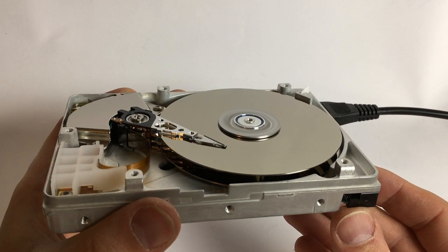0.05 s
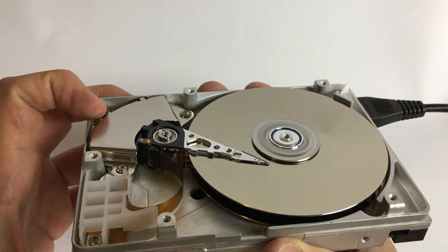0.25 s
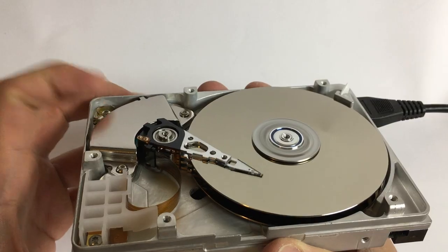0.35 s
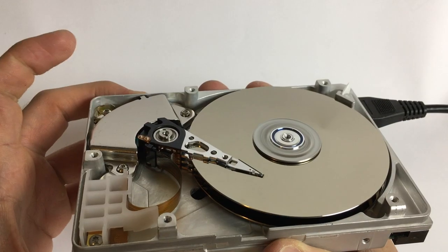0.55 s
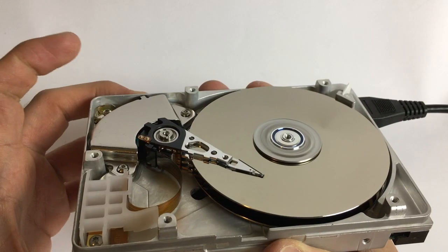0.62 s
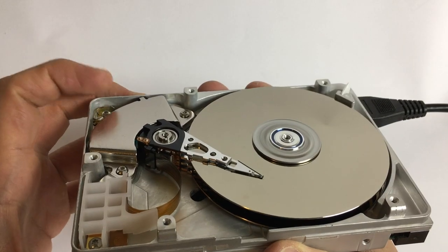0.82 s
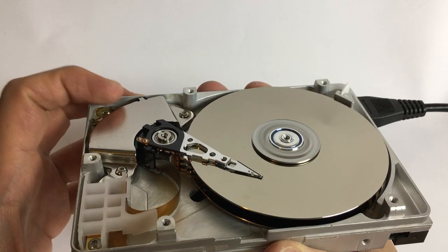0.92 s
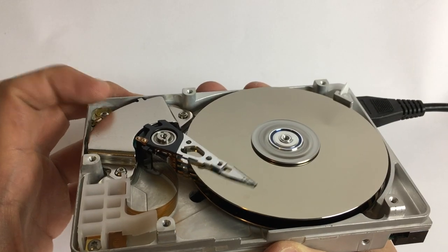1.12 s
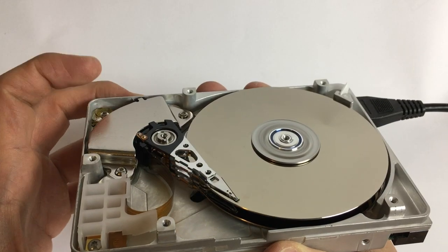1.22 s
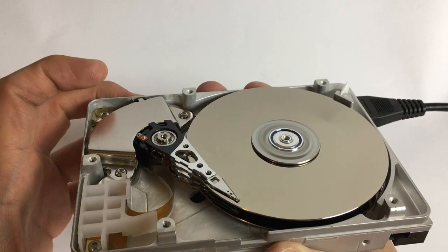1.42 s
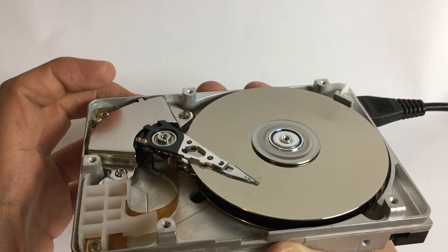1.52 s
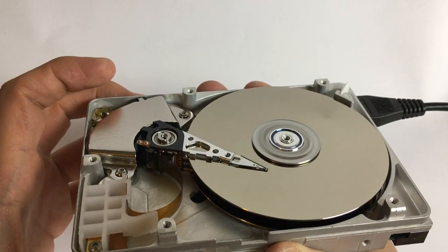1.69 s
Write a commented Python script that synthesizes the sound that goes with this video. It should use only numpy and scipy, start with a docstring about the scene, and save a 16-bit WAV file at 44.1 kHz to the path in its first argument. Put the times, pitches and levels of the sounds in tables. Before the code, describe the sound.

An open hard drive whirs throughout, close by in a small room, with high singing tones. A thin whine stops just before 0.2 seconds, then the flicked arm hits its stop with a loud metallic double click and a soft bump. Light ticks and tiny squeaks follow around 0.3 seconds and from 1 second on. From 1.3 seconds the heads scrape the platter while the whirr swells.

```python
"""An open hard drive spins close by in a small room: shaft hum, motor whine, singing bearings, rushing air.
A thin whine stops at 0.16 s; a finger flicks the head arm, which snaps against its stop with a loud
double click at 0.22 s. The arm then ticks and the head springs squeak as it is nudged to and fro.
From 1.3 s the heads scrape on the platter while the whirr swells."""
import sys
import numpy as np
from scipy import signal
from scipy.fft import rfft, irfft
from scipy.io import wavfile
from scipy.ndimage import uniform_filter1d

SR = 44100
rng = np.random.default_rng(int(sys.argv[2]) if len(sys.argv) > 2 else 0)


def file_out(sig):
    """Save sig as 16-bit WAV at sys.argv[1]."""
    # one column per channel
    cols = np.atleast_2d(sig).T
    # limit, then scale
    lim = np.clip(cols, -1, 1)
    pcm = np.round(lim * 32767).astype(np.int16)
    wavfile.write(sys.argv[1], SR, pcm)


N = 77175
T = np.arange(N) / SR
SHAFT_HZ = 86.333

# spindle load: t/s, share/0-1
SPINDLE_LOAD = [(0, 0.5), (.3, 0), (.75, 0.14), (.92, 0.83), (1.15, 0.68), (1.28, 0.87), (1.42, 1),
                (1.75, 0.79)]
# modes of arm and head springs: f/Hz, width/Hz, level/dB
ARM_MODES = [(845, 25, 2), (905, 25, 1), (1060, 30, 5), (1170, 45, -1), (1510, 40, -8), (1640, 30, -7),
             (2305, 30, 5), (3350, 400, -9), (4950, 100, -7), (6930, 30, -5), (7380, 25, 3), (7980, 30, -6),
             (8880, 25, -5), (11295, 50, -1)]


def undb(db):
    """Decibels to gain."""
    return 10 ** (np.asarray(db) / 20)


def unit(x):
    """Scale to rms 1."""
    return x / np.sqrt(np.mean(x ** 2))


def curve(rows):
    """Linear envelope through (t/s, value) rows."""
    return np.interp(T, *np.array(rows).T)


def noise():
    """White noise."""
    return rng.standard_normal(N)


def drift(rate_hz):
    """Smooth random drift, spread near 1."""
    hold = int(SR / rate_hz)
    steps = np.repeat(noise()[:N // hold + 1], hold)
    return 1.3 * uniform_filter1d(uniform_filter1d(steps, hold), hold)[:N]


def tone(hz):
    """Sine of rms 1 along a pitch curve."""
    return np.sqrt(2) * np.sin(2 * np.pi * (np.cumsum(hz) / SR + rng.random()))


def through(x, response):
    """Convolve with a response scaled to unit energy."""
    return signal.fftconvolve(x, response / np.linalg.norm(response))[:N]


def colour(x, points, size=4096):
    """Minimum-phase filter from (f/Hz, relative level/dB) rows."""
    hz, db = np.array(points).T
    log_hz = np.log(np.fft.rfftfreq(size, 1 / SR) + 1)
    gain = undb(np.interp(log_hz, np.log(hz), db))
    cepstrum = irfft(np.log(gain))[:size // 2]
    cepstrum[1:] *= 2
    return through(x, irfft(np.exp(rfft(cepstrum, size))))


def ring(x, modes):
    """Drive damped modes of alternating sign: f/Hz, width/Hz, relative level/dB."""
    t = T[:N // 4]
    response = np.zeros_like(t)
    for k, (hz, width_hz, db) in enumerate(modes):
        envelope = undb(db) * width_hz * np.exp(-np.pi * width_hz * t)
        response += (-1) ** k * envelope * np.cos(2 * np.pi * hz * t)
    return through(x, response)


def chatter(rows):
    """Sharp bursts of contact noise that die away quickly: t/s, level/dB, length/s."""
    power = sum((T >= s) * undb(db) ** 2 * np.exp(-2 * np.abs(T - s) / length_s)
                for s, db, length_s in rows)
    return np.sqrt(power) * np.sign(noise())


def platter(x, share, t60_s=0.23, above_hz=1660):
    """A share of the treble power rings the platters' dense modes."""
    modes = noise() * np.exp(-np.log(1000) * T / t60_s)
    bass = signal.sosfiltfilt(signal.butter(2, above_hz, fs=SR, output="sos"), x)
    treble = x - bass
    return bass + np.sqrt(1 - share) * treble + np.sqrt(share) * through(treble, modes)


def room(x, t60_s=0.37, delay_s=0.00725):
    """Short, dense tail from nearby walls."""
    spectrum = [(200, -1.5), (1100, 1), (4000, 3.5), (9000, 0.5), (15000, 4)]  # f/Hz, level/dB
    tail = noise() * (T > delay_s) * np.exp(-np.log(1000) * T / t60_s)
    return undb(-10) * through(x, colour(tail, spectrum))


def room_air():
    """Faint, steady rumble of the air in the room."""
    # rumble: f/Hz, level/dB
    spectrum = [(25, -41), (55, 6), (90, 5), (130, 6), (350, -1), (700, 3), (1200, -7.5), (3000, -28.5)]
    return undb(-63) * colour(noise(), spectrum)


def spindle(speed_waver=.0001, bearing_jitter=0.000755):
    """Unbalance hums once a turn, motor poles whine, bearings sing; load shifts their levels."""
    # motor whine: shaft order, light level/dB, loaded level/dB
    motor_orders = [(72, -67, -66), (96, -73, -68), (120, -72, -66), (144, -68, -63), (168, -60, -63)]
    # bearing tones: f/Hz, light level/dB, loaded level/dB
    bearing_tones = [(3416, -67, -57), (3686, -62, -50), (3757, -65, -54), (4097, -65, -49),
                     (4113, -54, -56), (4432, -74, -48), (4841, -65, -59), (4859, -72, -53),
                     (6330, -58, -70), (6725, -70, -62)]
    speed = 1 + speed_waver * drift(4.84)
    load = curve(SPINDLE_LOAD)
    out = tone(SHAFT_HZ * speed) * undb(-65 + 4 * load + 2 * drift(14.8))
    for order, light_db, loaded_db in motor_orders:
        level_db = light_db + (loaded_db - light_db) * load
        out += tone(order * SHAFT_HZ * speed) * undb(level_db + 2 * drift(13.6))
    for hz, light_db, loaded_db in bearing_tones:
        level_db = light_db + (loaded_db - light_db) * load + 1.5 * drift(45.1)
        out += tone(hz * (speed + bearing_jitter * drift(70.3))) * undb(level_db - 0.5)
    return out


def whirr(throb_depth=0.11):
    """Air rushes off the platters and rolling noise rings the frame, throbbing once a turn."""
    # rushing air: f/Hz, level/dB
    air_spectrum = [(40, -33), (130, -15.5), (350, -9), (700, -9.5), (1300, -13), (2050, -13.5),
                    (3300, -5.5), (4300, -4.5), (5300, -11.5), (6200, -11), (7600, -21), (9000, -21),
                    (11300, -14.5), (12700, -20.5), (14300, -20), (15800, -16.5)]
    # modes of platters and frame: f/Hz, width/Hz, level/dB
    frame_modes = [(1554, 89, -11.5), (2478, 40, -9), (3207, 16, -1), (3320, 40, -7), (3740, 21, -0.5),
                   (3770, 56, -22), (4096, 26, 4.5), (4202, 32, -2), (4300, 25, -14), (4820, 10, -26),
                   (4905, 17, -5)]
    # whirr envelope: t/s, level/dB
    levels = [(0, -42), (.1, -37), (.16, -41), (.2, -37.5), (.36, -42.5), (.52, -45.5), (.74, -45),
              (.86, -44), (.92, -41.5), (1.06, -44), (1.2, -40), (1.29, -41.5), (1.36, -37.5), (1.5, -39),
              (1.62, -37), (1.75, -42.5)]
    air = colour(platter(noise(), share=0.57), air_spectrum) * undb(-3 + drift(60.57))
    frame = ring(noise(), frame_modes) * undb(-6.5 - curve(SPINDLE_LOAD))
    throb = 1 + throb_depth * np.sin(2 * np.pi * SHAFT_HZ * T)
    return (air + frame) * undb(curve(levels)) * throb


def whistle():
    """Head springs sing in the air stream in narrow, restless bands."""
    # spring modes: f/Hz, width/Hz, level/dB
    spring_modes = [(5588, 70, -7), (6340, 70, 2), (6710, 50, -11), (10150, 60, -13), (10375, 70, -13),
                    (14195, 90, -4), (14510, 55, -2)]
    # whistle envelope: t/s, level/dB
    levels = [(0, -49), (.07, -49.5), (.135, -47), (.16, -47.5), (.33, -48.5), (.38, -52.5), (.62, -52),
              (.9, -56), (.98, -52.5), (1.3, -68), (1.6, -54), (1.75, -74)]
    bands = np.zeros(N)
    for hz, width_hz, db in spring_modes:
        mode = [(hz, width_hz, 0)]
        bands += undb(db) * ring(ring(noise(), mode), mode)
    return unit(bands) * undb(curve(levels))


def opening_whine(end_s=0.16, fade_s=.012, jitter_hz=17):
    """Three thin tones that stop as the finger reaches the arm."""
    # whine tones: f/Hz, level/dB
    partials = [(5588, -52), (10385, -52), (14515, -51)]
    gate = np.clip((end_s - T) / fade_s + .5, 0, 1)
    return gate * sum(undb(db - 3.5) * tone(hz + jitter_hz * drift(200)) for hz, db in partials)


def thuds(hz=82, rise_s=0.013):
    """Finger and blow rock the hand-held drive."""
    # soft bumps: t/s, peak level/dB
    bumps = [(.15, -50), (.235, -48), (.285, -54)]
    out = np.zeros(N)
    for s, db in bumps:
        age_s = np.maximum(T - s, 0)
        envelope = age_s / rise_s * np.exp(1 - age_s / rise_s)
        out += undb(db) * envelope * np.sin(2 * np.pi * hz * age_s)
    return out


def squeaks(hz=11295, jitter=.003, edge_s=.004):
    """A head spring sticks and slips on the platter, singing one high note."""
    # squeaks: t/s, length/s, level/dB
    slips = [(.290, 0.013, -44), (1.103, .012, -43.5), (1.141, 0.013, -53), (1.166, .012, -49),
             (1.421, 0.0091, -43.5), (1.464, 0.023, -43), (1.538, 0.083, -44)]
    envelope = np.zeros(N)
    for s, length_s, db in slips:
        inside_s = np.minimum(T - s, s + length_s - T)
        envelope += undb(db) * np.clip(inside_s / edge_s + .5, 0, 1)
    return envelope * tone(hz * (1 + jitter * drift(200)))


def head_scrape(grain_db=3):
    """Grainy friction of the heads rings the arm and hisses through the platters."""
    # friction envelope: t/s, level/dB
    levels = [(1.28, -90), (1.33, -52.5), (1.41, -48), (1.45, -42), (1.49, -51.5), (1.53, -44),
              (1.555, -41), (1.62, -44.5), (1.69, -46.5), (1.75, -49)]
    # scrape hiss: f/Hz, level/dB
    spectrum = [(500, -26), (900, -8), (2000, -8), (4500, -15), (7000, 2), (11300, 1), (12400, -15),
                (14200, 4.5), (16000, -3)]
    friction = unit(noise() * undb(grain_db * drift(500))) * undb(curve(levels))
    hiss = colour(platter(friction, share=0.86), spectrum)
    return undb(-1) * (ring(friction, ARM_MODES) + hiss)


def arm_ticks(knock_below_hz=2000):
    """Light contacts ring the nudged arm; its low modes add a hollow knock to some."""
    # contacts: t/s, level/dB, length/s, knock offset/dB
    nudges = [(0.282, 5, 0.0017, 10), (0.289, 4.5, 0.0047, 0.5), (0.315, -0.5, 0.0021, 2),
              (.7657, -9, 0.0052, -10), (1.0108, -2, 0.0031, 0), (1.0306, -9, .004, 3),
              (1.098, -2.5, 0.0066, -25), (1.1362, 2, 0.0077, -20), (1.141, -9, 0.0025, 1.5),
              (1.1534, 2, 0.0017, 2), (1.1715, -3.5, 0.0033, 9), (1.322, -4.5, 0.0046, -8),
              (1.4, -4, 0.0014, -6), (1.4212, 4, 0.0047, -7), (1.462, 0.5, 0.0067, 13.5),
              (1.5332, 5, 0.0067, -6), (1.5465, 7.5, 0.0039, 8.5)]
    # tick crack: f/Hz, level/dB
    spectrum = [(500, -21.5), (900, -12), (2000, -7.5), (3700, 7), (6000, -1.5), (8000, -8.5), (11300, 1),
                (12500, -4), (14700, -5), (16000, -1)]
    ticks = chatter([(s, db, length_s) for s, db, length_s, _ in nudges])
    knocks = chatter([(s, db + knock_db, length_s) for s, db, length_s, knock_db in nudges])
    low_modes = [mode for mode in ARM_MODES if mode[0] < knock_below_hz]
    body = undb(-40.5) * ring(ticks, ARM_MODES) + undb(-44.5) * ring(knocks, low_modes)
    return body + undb(-33.5) * colour(ticks, spectrum)


def arm_snap():
    """The arm hits its stop and rebounds; the casting rings and the contact crackles."""
    # blows on the stop: t/s, chatter level/dB, chatter length/s, impulse level/dB
    blows = [(.2170, -12, .002, -26), (0.2191, -5, .0018, -8.5), (.2300, 1, 0.0018, 1),
             (0.2327, -2.5, 0.0014, -18), (0.2356, -9, 0.0029, -16), (0.2463, -13, .003, -34)]
    # modes of the casting: f/Hz, width/Hz, level/dB
    casting_modes = [(836, 18, 5), (1172, 24, 8), (1498, 30, -3), (2720, 50, -6), (3660, 40, -6),
                     (3813, 40, -1), (3888, 40, -4), (4160, 50, -2), (4240, 50, -3), (5160, 200, -7),
                     (5720, 70, -3), (6305, 90, 3), (6712, 60, -1), (7160, 200, -10), (9540, 300, -8)]
    # whole click: f/Hz, level/dB
    spectrum = [(200, -40), (650, -16.5), (850, -3), (1200, -5.5), (1550, -6.5), (1900, -19), (2700, -6.5),
                (3200, -9.5), (4100, 0), (4700, -7), (5150, -5.5), (5450, -6.5), (6300, 2), (7200, -3),
                (7700, -9), (8600, -10.5), (9500, -0.5), (10400, -16), (11700, -7), (12250, -20),
                (13000, -10), (14200, -10), (15800, -9.5)]
    impulses = np.zeros(N)
    for s, _, _, impulse_db in blows:
        impulses[int(s * SR)] += undb(impulse_db)
    casting = undb(0.5) * ring(impulses, casting_modes)
    crackle = undb(-6) * chatter([row[:3] for row in blows])
    return colour(casting + crackle, spectrum)


def scene():
    """Running drive, arm sounds with their room tail, thuds and room air; mono."""
    drive = spindle() + whirr() + whistle() + opening_whine()
    arm = arm_snap() + arm_ticks() + head_scrape() + squeaks()
    return (drive + arm + room(arm) + thuds() + room_air())[None]


def record(dry, top_hz=15650):
    """Steep elliptic low-pass."""
    return signal.sosfilt(signal.ellip(10, .2, 80, top_hz, fs=SR, output="sos"), dry)


dry = scene()
out = record(dry)
file_out(out)
```